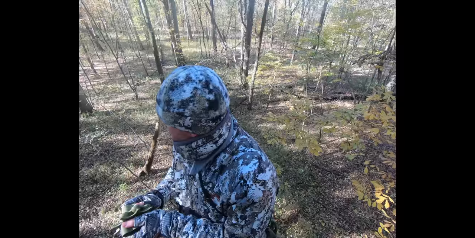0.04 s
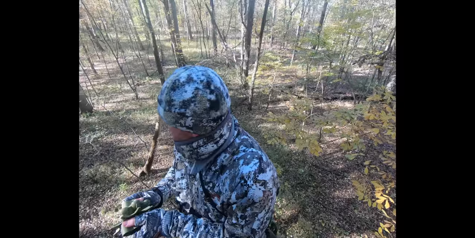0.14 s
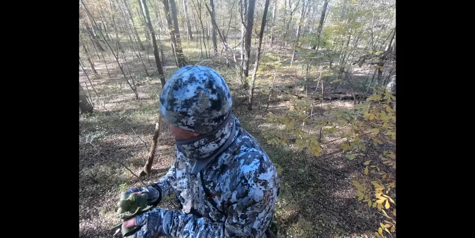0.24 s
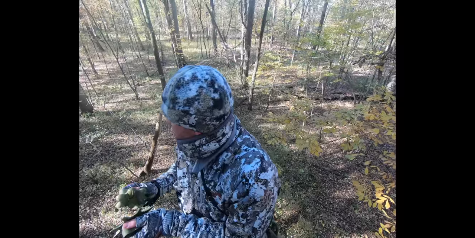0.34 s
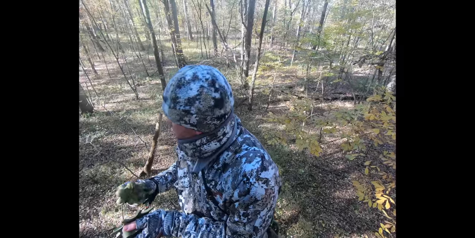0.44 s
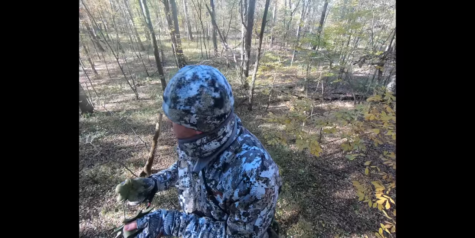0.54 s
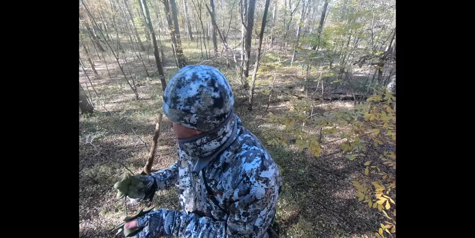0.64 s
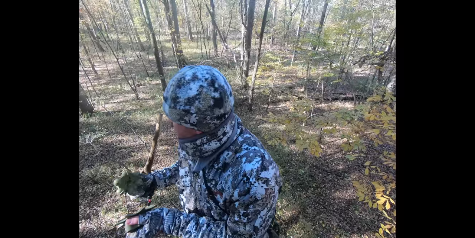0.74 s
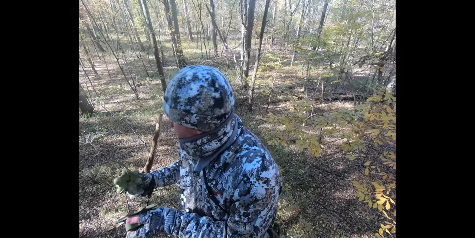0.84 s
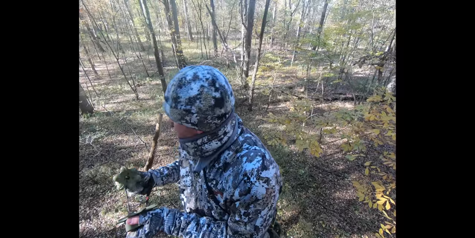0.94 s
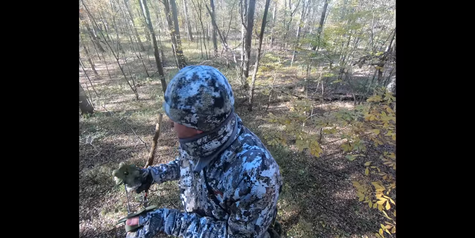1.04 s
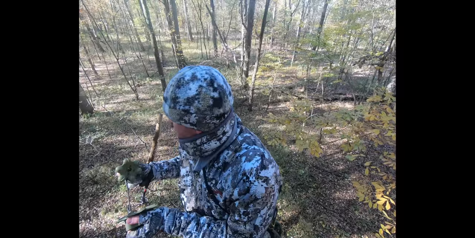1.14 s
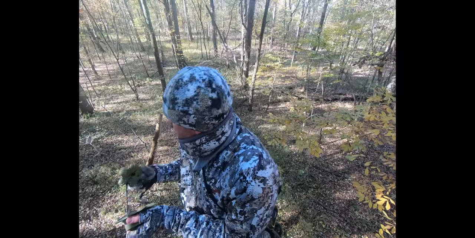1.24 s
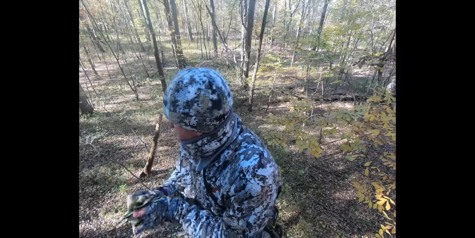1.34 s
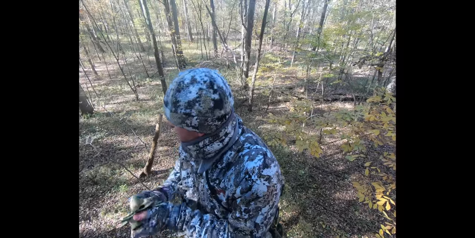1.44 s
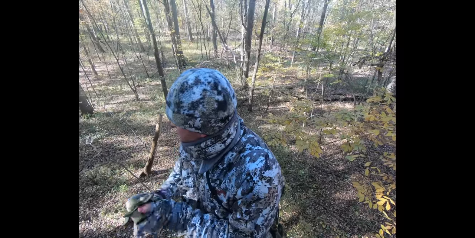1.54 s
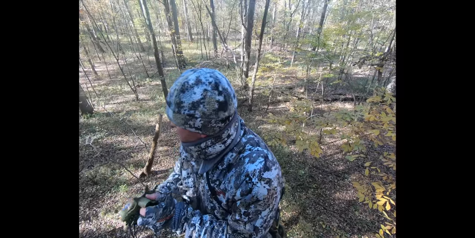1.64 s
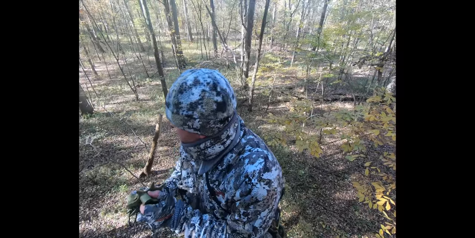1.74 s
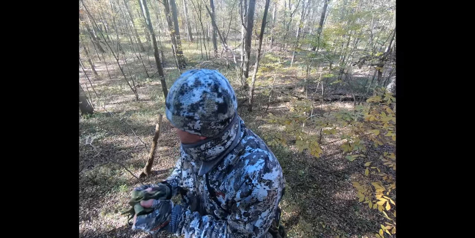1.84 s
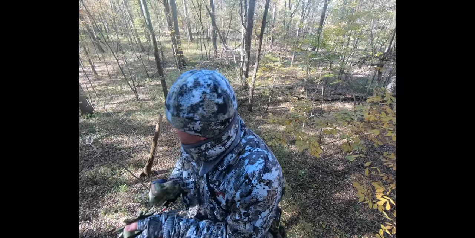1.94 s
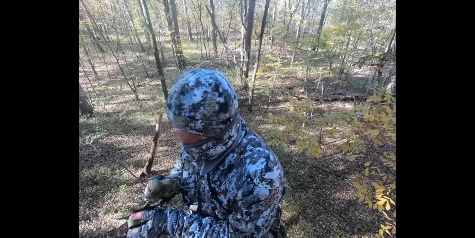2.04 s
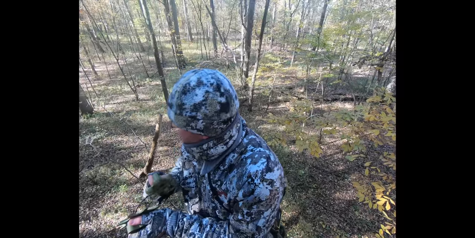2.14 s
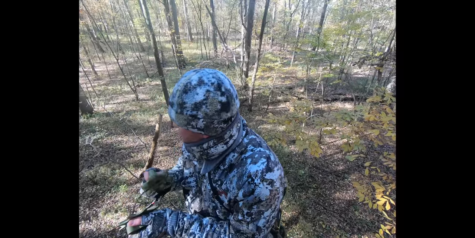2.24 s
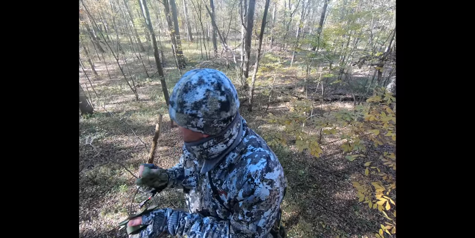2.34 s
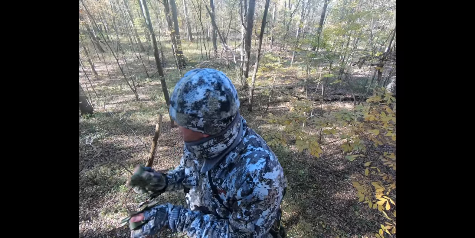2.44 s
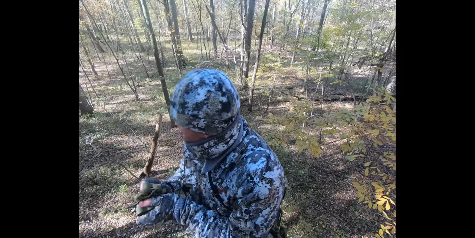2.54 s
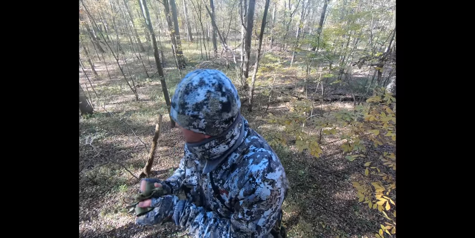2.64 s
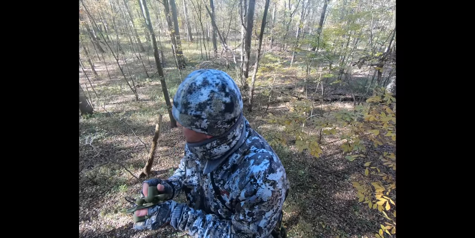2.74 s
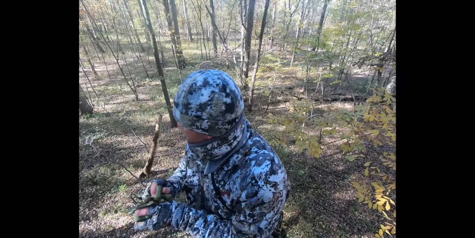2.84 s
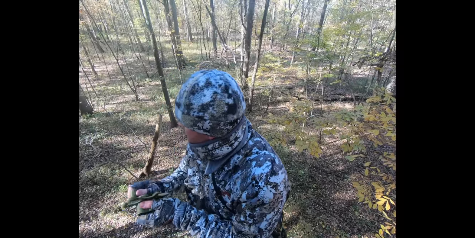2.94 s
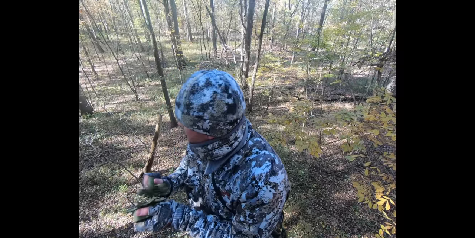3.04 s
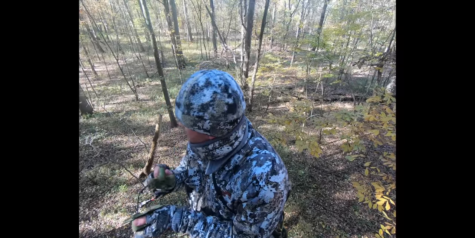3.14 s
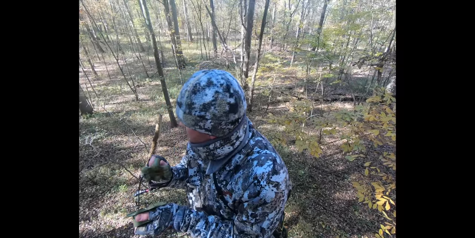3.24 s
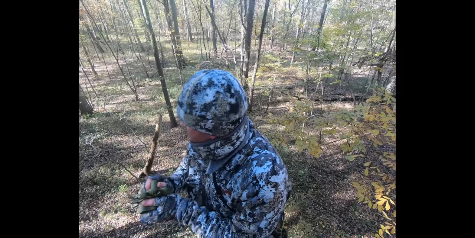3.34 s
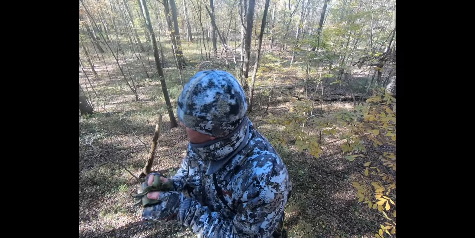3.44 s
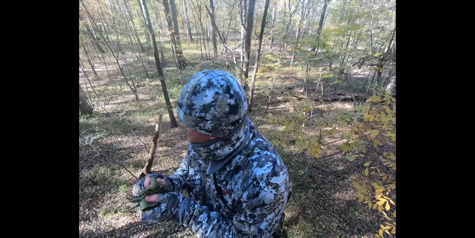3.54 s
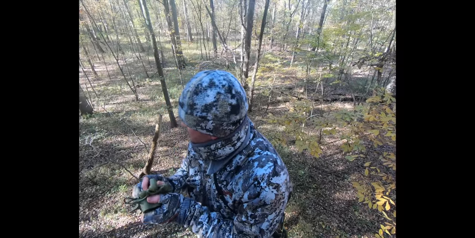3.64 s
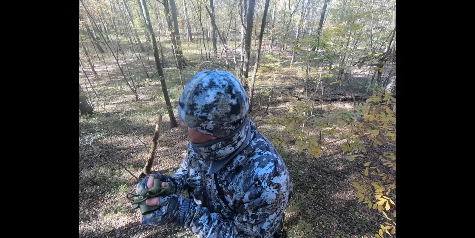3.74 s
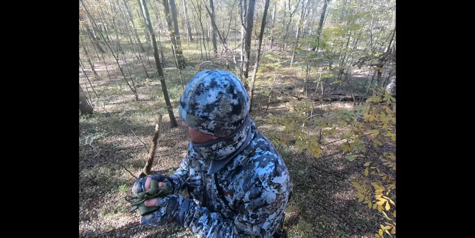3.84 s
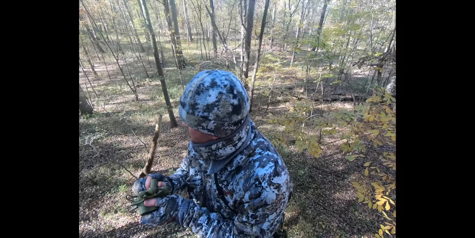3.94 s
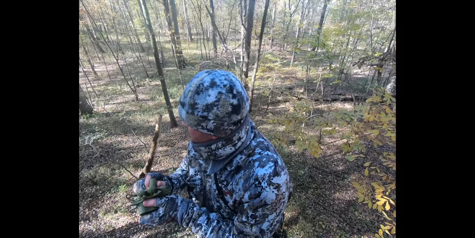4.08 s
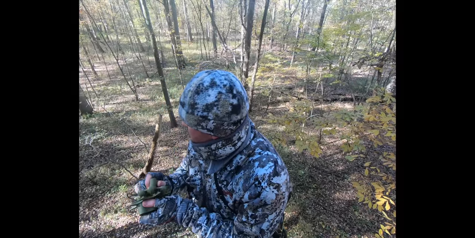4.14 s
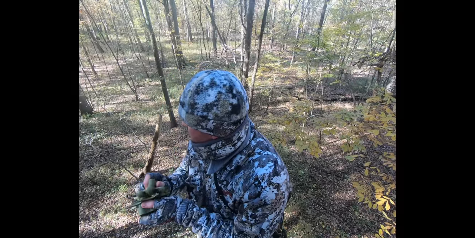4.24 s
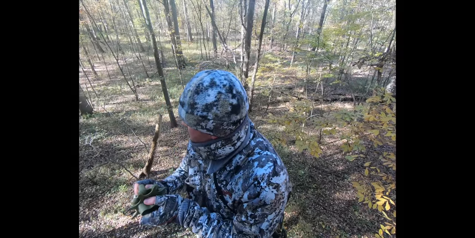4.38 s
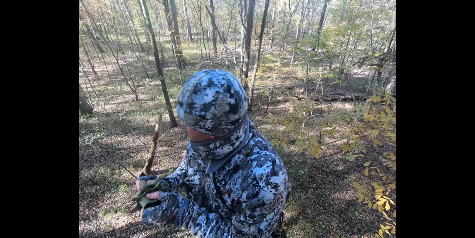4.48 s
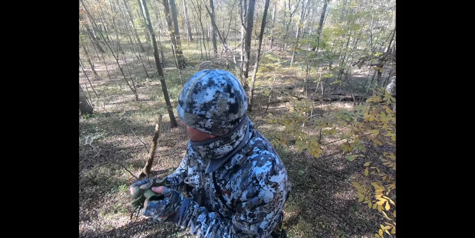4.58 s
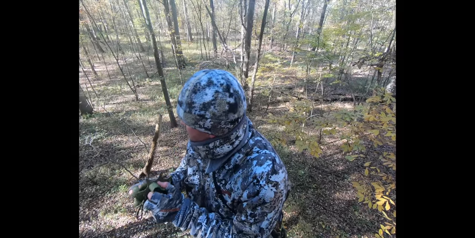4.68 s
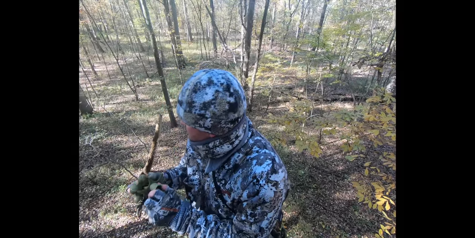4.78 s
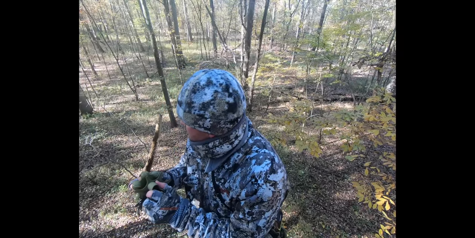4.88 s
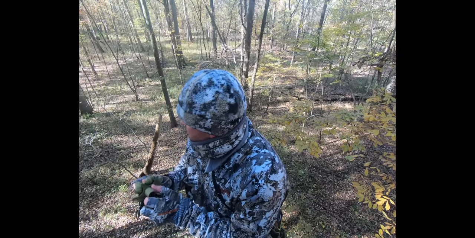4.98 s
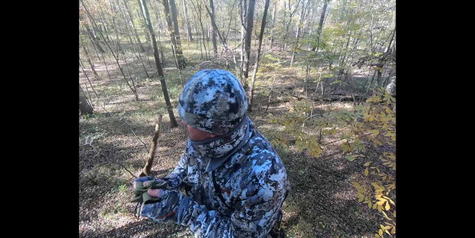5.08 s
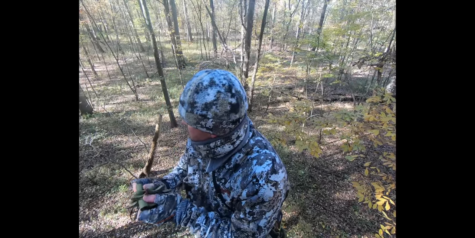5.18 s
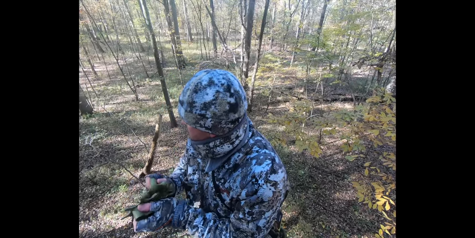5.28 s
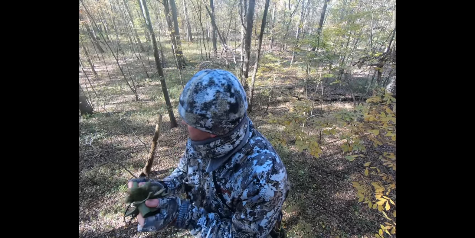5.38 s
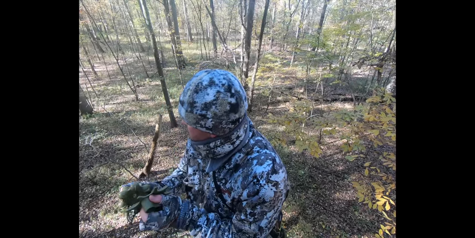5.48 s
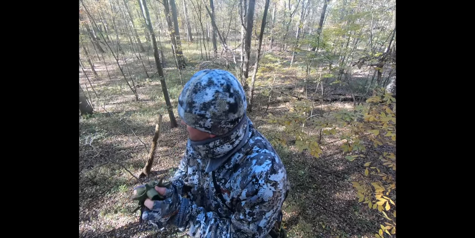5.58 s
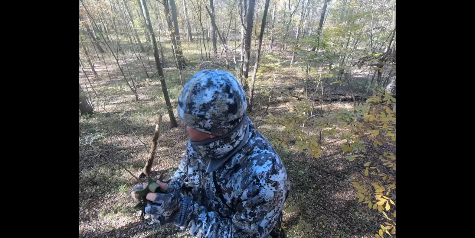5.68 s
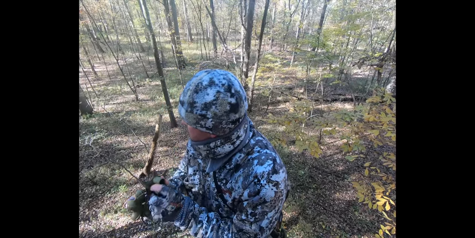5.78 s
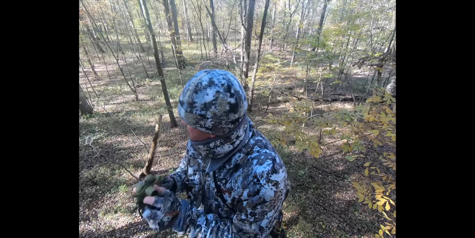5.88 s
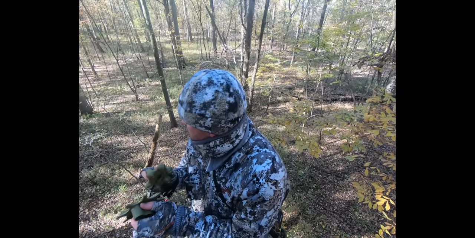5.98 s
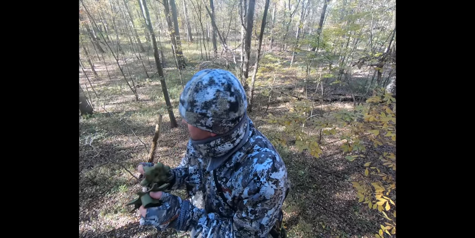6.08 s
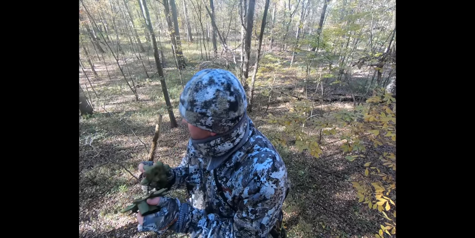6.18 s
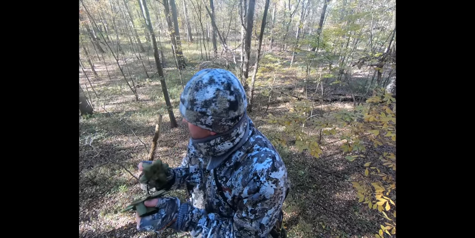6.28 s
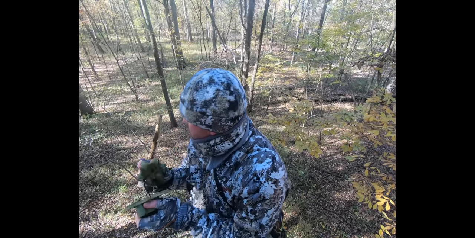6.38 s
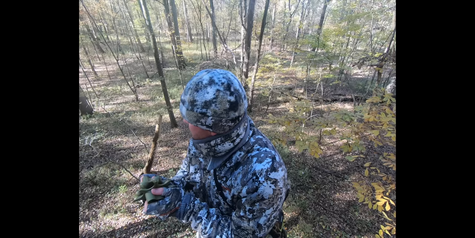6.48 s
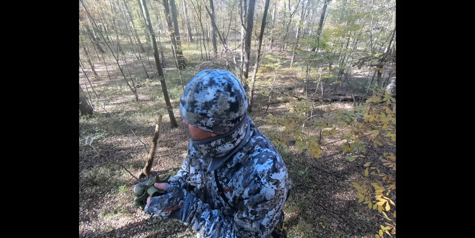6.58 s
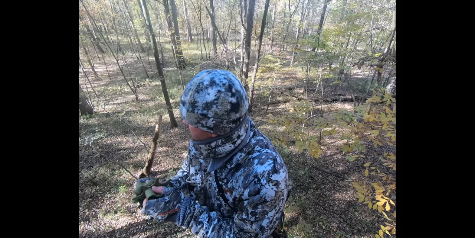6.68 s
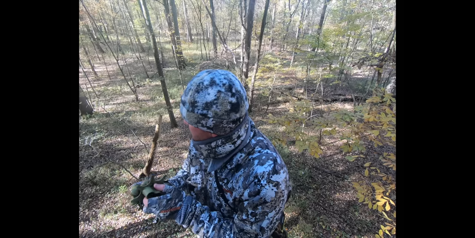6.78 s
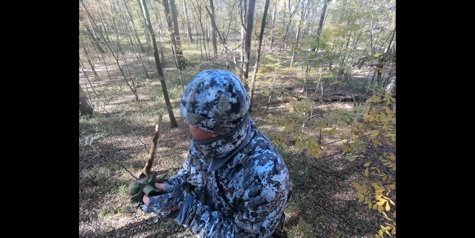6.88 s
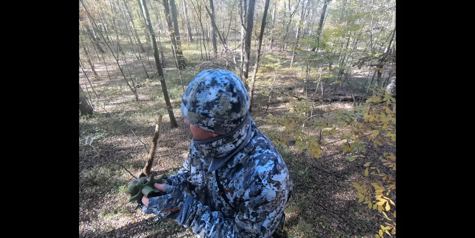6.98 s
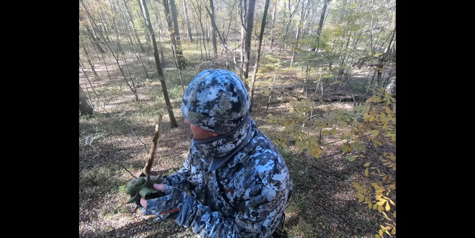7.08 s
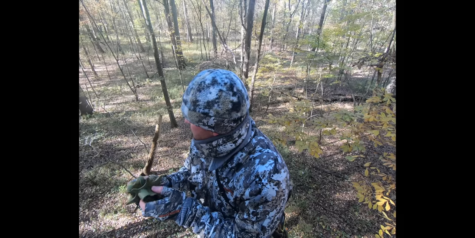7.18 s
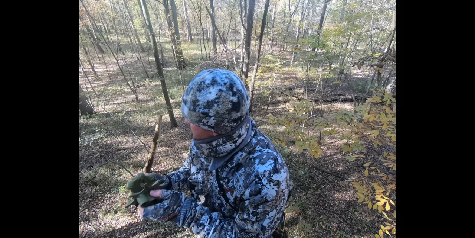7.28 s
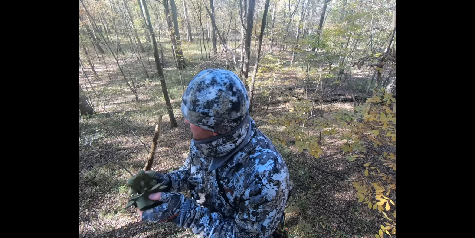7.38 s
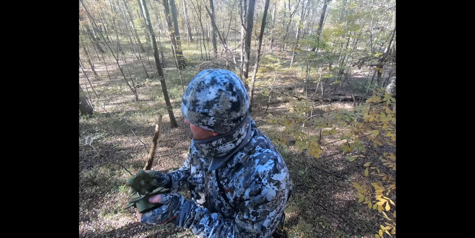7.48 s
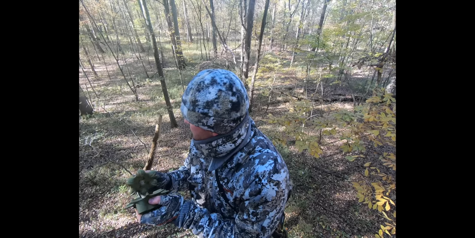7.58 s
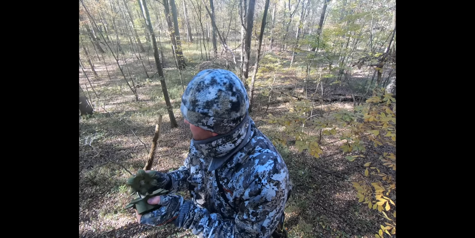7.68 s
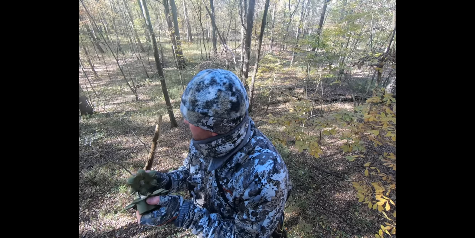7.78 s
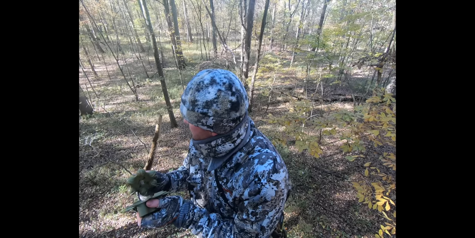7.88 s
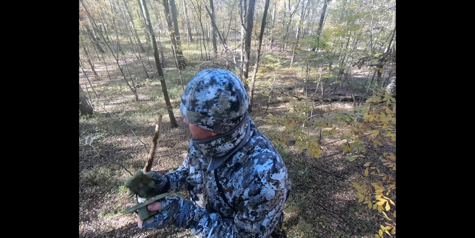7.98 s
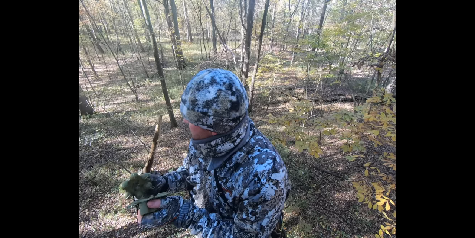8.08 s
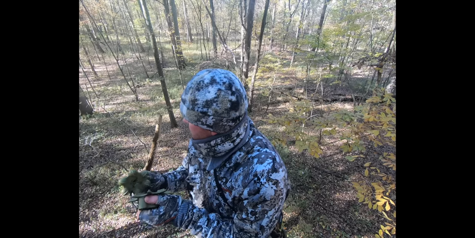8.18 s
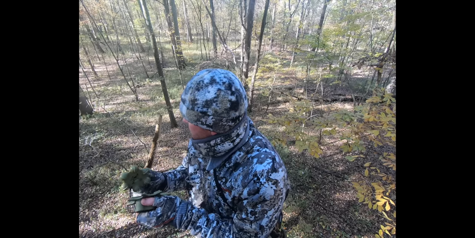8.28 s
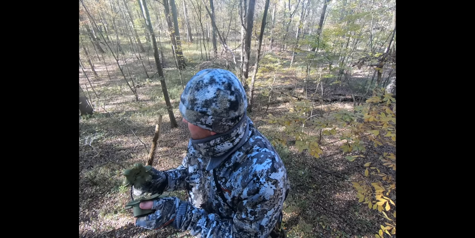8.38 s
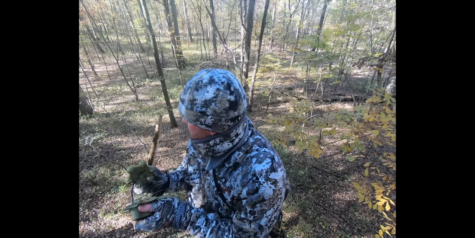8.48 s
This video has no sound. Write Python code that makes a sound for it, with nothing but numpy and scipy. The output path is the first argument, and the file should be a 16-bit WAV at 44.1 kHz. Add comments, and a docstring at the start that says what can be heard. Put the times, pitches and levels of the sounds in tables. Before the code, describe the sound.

Two deer antlers clack and grind together close by in short uneven bouts, sharp cracks echoing softly through quiet woods with faint bird calls.

```python
"""Antler rattling in a quiet wood

A hunter rattles two deer antlers in short bouts, an arm's length from a two-channel microphone.
Each clack is a run of tiny slips that rings the antlers; scattered echoes follow as a long soft tail.
Filtered noise makes faint glove and sleeve bumps; gliding sines make the thin calls of a far bird.
Far traffic is a shaped-noise wash with wavering sines for the engines."""
import sys
import numpy as np
from scipy import signal
from scipy.fft import rfft, irfft
from scipy.io import wavfile
from scipy.ndimage import uniform_filter1d, minimum_filter1d

SR = 44100
rng = np.random.default_rng(int(sys.argv[2]) if len(sys.argv) > 2 else 0)


def bounce(signal):
    """Save signal as a 16-bit WAV file at the path given by the first command-line argument."""
    frames = np.transpose(np.atleast_2d(signal))
    limited = np.clip(frames, -1, 1)
    pcm = np.round(limited * 32767).astype(np.int16)
    wavfile.write(sys.argv[1], SR, pcm)


N = 375732
TIME = np.arange(N) / SR


def from_db(db):
    """Decibels to gain."""
    return 10 ** (np.asarray(db) / 20)


def rms_one(x):
    """Scale to an rms of 1."""
    return x / np.sqrt(np.mean(x ** 2) + 1e-20)


def at_hz(points, hz):
    """Read a table on a log-frequency axis."""
    points = np.array(points)
    return np.interp(np.log(hz), np.log(points[:, 0]), points[:, 1])


def butter(x, hz, kind, order=2):
    """Causal Butterworth filter along time."""
    sections = signal.butter(order, np.clip(hz, 10, .45 * SR), kind, fs=SR, output="sos")
    return signal.sosfilt(sections, x)


def add(out, s, sound):
    """Mix a sound in, starting at s seconds."""
    start = max(0, round(s * SR))
    out[start:start + len(sound)] += sound[:N - start]


def drift(per_s):
    """Random wander joining per_s normal draws a second with straight lines."""
    knots = np.arange(0, N / SR + 2 / per_s, 1 / per_s)
    return np.interp(TIME, knots, rng.standard_normal(len(knots)))


def decorrelate(mid, side, mid_share, side_share):
    """Two channels from a shared part and a part of opposite sign, given their power shares."""
    return np.sqrt(mid_share) * mid + np.sqrt(side_share) * side * [[1], [-1]]


# Spectrum of still air and far traffic. Each row: frequency in Hz, relative density in dB per Hz.
AIR_SPECTRUM = [(13, -37.5), (22, -10.5), (49, -8.5), (91, -22.5), (151, 1.5), (251, -6.5), (276, -6),
                (480, -18.5), (796, -17), (877, -17.5), (1060, -28), (2530, -37.5), (4300, -38.5),
                (6960, -42), (9050, -71), (15300, -120)]
# Left-right likeness of the wash. Each row: frequency in Hz, likeness from 0 to 1.
LIKENESS_POINTS = [(30, 1), (70, 0.1), (150, 0.4), (400, 0.7), (1000, 0), (3000, 0.2), (10000, 0.18)]
# Tones of far engines. Each row: centre pitch in Hz, level in dB relative to the wash curve.
ENGINE_TONES = [(264.5, -6.5), (345.5, -11.5)]
# The level of the wash, lower during and after the bouts of rattling. Each row: time in seconds, level in dB
# before the wash gain.
WASH_CURVE = [(0.0, -62.5), (1.56, -63), (2.37, -67), (2.82, -66.5), (3.82, -68), (4.82, -62.5),
              (5.77, -66), (6.5, -63), (6.64, -67.5), (8.52, -63)]
# The deep engine drone coming and going. Each row: time in seconds, level in dB before the drone gain.
DRONE_CURVE = [(0.0, -69), (0.33, -65), (0.73, -79), (1.87, -85), (1.92, -66.5), (3.04, -85.5),
               (3.94, -69.5), (4.56, -71), (4.74, -88), (4.89, -66), (6.1, -69.5), (6.83, -89.5),
               (6.88, -72), (7.17, -73), (7.52, -62), (8.28, -75), (8.52, -87.5)]


def background(wash_gain_db=2, drone_gain_db=-3, drone_hz=41.7, waver_db=1.5,
               wander=0.012, drone_wander=0.14):
    """Far traffic: shaped noise for the wash, wavering sines for the drone and two engine tones."""
    wash_db = np.interp(TIME, *np.transpose(WASH_CURVE))
    drone_db = np.interp(TIME, *np.transpose(DRONE_CURVE))
    hz = np.maximum(np.fft.rfftfreq(N, 1 / SR), 1)
    mid, side = rfft(rng.standard_normal((2, N))) * from_db(at_hz(AIR_SPECTRUM, hz))
    alike = np.clip(at_hz(LIKENESS_POINTS, hz), 0, 1)
    wash = rms_one(irfft(decorrelate(mid, side, 1 + alike, 1 - alike), N))

    def tone(pitch_hz, db, spread):
        """A sine that wanders in pitch (spread as a fraction) and in level."""
        phase = 2 * np.pi * np.cumsum(pitch_hz * (1 + spread * drift(9))) / SR
        return from_db(db + waver_db * drift(3.9)) * np.sqrt(2) * np.sin(phase)

    engines = sum(tone(pitch_hz, wash_db + db, wander) for pitch_hz, db in ENGINE_TONES)
    drone = tone(drone_hz, drone_db + drone_gain_db, drone_wander)
    balance = from_db([[-.6], [.6]])
    return (from_db(wash_db + wash_gain_db) * wash + engines + drone) * balance


# Calls of a far bird. Each row: start in seconds, length in seconds, starting pitch in Hz,
# level in dB before the gains of the direct and scattered paths.
BIRD_CALLS = [(0.0, 0.13, 7700, -77), (0.448, 0.18, 7240, -62.5), (0.695, 0.16, 7800, -67),
              (2.297, 0.19, 6950, -68), (3.16, 0.11, 7080, -64.5), (3.356, 0.08, 7350, -67.5),
              (4.5, 0.22, 7260, -63), (5.46, 0.2, 7120, -70), (6.312, 0.12, 7070, -68),
              (7.415, 0.13, 6800, -66.5), (8.108, 0.052, 7650, -84.5), (8.299, 0.094, 7670, -78.5)]
BIRD_AIM_HZ = 7340   # every call glides towards this pitch


def bird(trill_hz=70, trill_depth_hz=120, waver_hz=80):
    """Thin whistles: sines gliding to one pitch, with a quick regular trill and a random shiver."""
    out, waver = np.zeros(N), waver_hz * drift(450)
    for s, length, first_hz, db in BIRD_CALLS:
        t = np.arange(int(length * SR)) / SR
        glide = np.linspace(first_hz, BIRD_AIM_HZ, len(t))
        trill = trill_depth_hz * np.sin(2 * np.pi * trill_hz * t)
        phase = 2 * np.pi * np.cumsum(glide + trill + waver[:len(t)]) / SR
        add(out, s, from_db(db) * signal.windows.tukey(len(t), .3) * np.sin(phase))
    return out


# Scattering by the trunks after a sharp click. Each row: band centre in Hz, relative level in dB,
# time to fall 60 dB in seconds.
WOOD_BANDS = [(300, -41.5, 0.66), (780, -32.5, .7), (1300, -23.5, 0.79), (1810, -16, 1.3), (2200, -11.5, 2),
              (2640, -18.5, 1.4), (3450, -15, 1.3), (4300, -22, 0.91), (5600, -22, 0.43), (6390, -30, .8),
              (6800, -25.5, .75), (7500, -38, .65), (8900, -34.5, 0.83), (10500, -56, 0.44),
              (13000, -83.5, .3)]


def wood(x, gap_s=.016, build_s=0.02, alike=.6, trunks_db=4, clumps_db=2, clumps_per_s=70):
    """Echoes from countless trunks: noise that builds up after a short gap and decays band by band."""
    size = 65536
    t, hz = np.arange(size) / SR, np.maximum(np.fft.rfftfreq(size, 1 / SR), 1)
    swell = 1 - np.exp(-np.maximum(t - gap_s, 0) / build_s)
    swell = swell * from_db(clumps_db * drift(clumps_per_s)[:size])   # trees stand in clumps
    trunks = from_db(trunks_db * rng.standard_normal(size))
    mid, side = rms_one(rng.standard_normal((2, size)) * trunks)
    alike = np.clip(alike, 0, 1)
    echoes = rfft(decorrelate(mid, side, alike, 1 - alike)) * from_db(at_hz(WOOD_BANDS, hz))
    centres, response = np.array(WOOD_BANDS)[:, 0], 0
    # overlapping triangular bands, each with its own decay
    for share, (centre, db, t60) in zip(np.eye(len(WOOD_BANDS)), WOOD_BANDS):
        fade = swell * from_db(-60 * t / t60)
        band = irfft(echoes * np.interp(hz, centres, share))
        response = response + band * fade / np.linalg.norm(fade)
    return signal.fftconvolve(x[None], response, axes=1)[:, :N]


# A light touch is hollow, a hard blow is all midrange: body below the midrange in relative dB
# at the medium level, and its change in dB per dB harder.
MEDIUM_DB, BODY_DB, BODY_PER_DB, COLOUR_SPREAD_DB = -22, -14.5, -0.48, 1
SLIP_S, SLIP_SPREAD = .0016, 0.12   # median decay time of a slip burst; spread in natural log units


def contact_rows(s, level_db, edge_db, tine_hz):
    """Colour contacts by their force: rows of (s, level dB, body dB, edge dB, tine Hz, slip s)."""
    body, edge, slip = rng.standard_normal((len(s), 3)).T
    body_db = BODY_DB + BODY_PER_DB * (level_db - MEDIUM_DB) + COLOUR_SPREAD_DB * body
    edge_db = edge_db + COLOUR_SPREAD_DB * edge
    return np.column_stack([s, level_db, body_db, edge_db, tine_hz, SLIP_S * np.exp(SLIP_SPREAD * slip)])


# Tine on tine. Each row: start in seconds, level in dB shared by all its catches, time the tines stay
# pressed in seconds, treble edge in relative dB before a random spread, ring of the struck tine in Hz.
CLACK_EVENTS = [(0.6458, -65, 0.0, -23, 2620), (1.0428, -41, 0.0, -10, 2780),
                (1.4095, -1.5, 0.0, -10.5, 3183), (1.6554, -23.5, 0.001, -13, 3650),
                (1.6915, -31, 0.01, -19, 3060), (1.7027, -8.5, 0.023, -21, 2210),
                (1.7639, -25.5, 0.0014, -22.5, 3180), (1.7921, -33, 0.0032, -21.5, 3020),
                (1.9119, -16.5, 0.012, -10, 3434), (1.9163, -8.5, 0.01, -29, 3070),
                (1.9549, -26, 0.0014, -19.5, 3180.0), (1.9642, -12, 0.0023, -19, 2160.0),
                (1.9817, -19.5, 0.0017, -18, 3350), (2.0965, -33, 0.016, -13.5, 3700),
                (2.5709, -14.5, 0.00056, -10.5, 3460.0), (2.5754, -7.5, 0.0049, -11.5, 3730),
                (2.7897, -34.0, 0.002, -18, 1940), (2.8168, -40.5, 0.012, -26, 1940),
                (2.8386, -25.5, 0.0075, -34, 2140), (2.8724, -19, 0.0046, -25, 3520),
                (2.896, -24.5, 0.0, -24.5, 2240.0), (2.9348, -22.5, 0.0023, -19.5, 2540.0),
                (2.9514, -19.5, 0.0, -23.5, 2720.0), (2.9565, -21, 0.01, -23, 2374),
                (2.976, -13.5, 0.0036, -16.5, 2083), (2.9885, -11.5, 0.011, -18.5, 2200),
                (3.0097, -14, 0.0011, -28.5, 2200.0), (3.038, -21.5, 0.0035, -18.5, 3800),
                (3.0748, -36.5, 0.0, -15, 2358), (3.44, -5.5, 0.0, -15.5, 2020),
                (3.7266, -33, 0.0015, -39, 2240.0), (3.7848, -43, 0.0033, -40, 2380),
                (3.8073, -45.5, 0.0029, -32, 2400), (4.1877, -60, 0.0041, -30, 2180),
                (4.29, -53, 0.0048, -31, 2230), (4.3388, -40, 0.0, -32, 2270),
                (4.3891, -25, 0.0021, -17, 2180), (4.4057, -13.5, 0.0034, -16.5, 2380),
                (4.4997, -31.5, 0.0, -19.5, 2090.0), (4.5268, -34.5, 0.0, -18, 2480.0),
                (4.5544, -24, 0.0, -11, 2230), (4.6364, -24.5, 0.0, -20, 1980),
                (4.6479, -17.5, 0.0071, -24, 2220), (4.6835, -24, 0.0, -17, 3470),
                (4.6974, -21.5, 0.00074, -13.5, 2290.0), (4.71, -11.5, 0.014, -27, 2090),
                (4.7415, -23.5, 0.0, -14.5, 2510), (4.7637, -27, 0.0, -22, 3130),
                (4.781, -25.5, 0.0, -18.5, 2900), (4.801, -20.5, 0.0028, -20.5, 2330),
                (4.8133, -12.5, 0.0047, -17, 3320), (4.8304, -16.5, 0.014, -19, 3210),
                (4.8546, -27.5, 0.0, -19, 3520.0), (4.8757, -19.5, 0.0, -15, 3360),
                (4.8927, -17.0, 0.0, -21, 2010.0), (4.9155, -26, 0.0017, -15.5, 3696),
                (4.9664, -20, 0.0031, -15, 2140.0), (4.9838, -8.5, 0.0097, -18, 3260),
                (5.0834, -23.5, 0.0, -19, 2380.0), (5.1032, -13, 0.0061, -17.5, 3330.0),
                (5.1198, -12.5, 0.019, -17, 3220.0), (5.1351, -16, 0.0, -22, 3270),
                (5.166, -27.5, 0.0, -22.5, 3200), (5.1897, -12.5, 0.012, -20.5, 3200),
                (5.2599, -34.0, 0.00056, -29, 2440), (5.2861, -17.5, 0.00028, -26.5, 3290),
                (5.3201, -19.5, 0.0, -24.5, 2290), (5.3372, -17.0, 0.00097, -17.5, 3250),
                (5.3543, -23.5, 0.0021, -24, 2180), (5.375, -26.5, 0.0, -24, 1980.0),
                (5.625, -6, 0.00033, -23.5, 2205), (5.6991, -36, 0.0062, -21, 2180),
                (5.805, -23.5, 0.0056, -32, 2260), (5.8183, -28, 0.00035, -25, 2310.0),
                (5.8324, -27, 0.0053, -24, 3515), (5.9303, -11, 0.0094, -21.5, 3386),
                (5.961, -13, 0.011, -20.5, 3153), (5.9844, -15.5, 0.0037, -23.5, 3500),
                (6.0003, -21.5, 0.0, -16, 3220), (6.5494, -8, 0.0037, -27, 3450.0),
                (6.5608, -12, 0.011, -16, 2139), (6.5975, -35, 0.00052, -20, 2030),
                (6.6133, -12.5, 0.00032, -15.5, 2230), (6.7359, -29.5, 0.0011, -23, 3290.0),
                (6.7605, -31.5, 0.0016, -40, 2290.0), (6.775, -41, 0.0042, -35, 2100),
                (6.9166, -37.5, 0.0047, -39, 3350), (8.416, -61.5, 0.0, -25.5, 3250)]
# the tines catch again at short uneven intervals, sinking while pressed and dying fast once they part
CATCH_S, CATCH_JITTER, CATCH_SPREAD_DB = .0048, .25, 2.5   # jitter in natural log units
PRESSED_DB_PER_S, PARTED_DB_PER_S = 200, 5000
GRAZE_DB = -40   # most that parting takes off a catch


def clacks(count=6):
    """Each clack shares its energy among a first blow and a quick run of catches."""
    s, level_db, pressed_s, edge_db, tine_hz = np.array(CLACK_EVENTS).T[:, :, None]
    shape = (len(s), count)
    gaps = CATCH_S * np.exp(CATCH_JITTER * rng.standard_normal(shape))
    delay = np.cumsum(gaps, axis=1) - gaps
    parted_db = np.maximum(-PARTED_DB_PER_S * np.maximum(delay - pressed_s, 0), GRAZE_DB)
    catch_db = parted_db - PRESSED_DB_PER_S * delay + CATCH_SPREAD_DB * rng.standard_normal(shape)
    # the catches of one clack add up to the energy of its level
    catch_db = catch_db - 10 * np.log10(np.sum(from_db(catch_db) ** 2, axis=1, keepdims=True))
    columns = np.broadcast_arrays(s + delay, level_db + catch_db, edge_db, tine_hz)
    return contact_rows(*(column.ravel() for column in columns))


# Locked antlers twisted against each other. Each row: start in seconds, end in seconds,
# mean level of the small ticks in dB.
GRIND_SPANS = [(1.07, 1.094, -62), (1.659, 1.812, -36), (1.929, 2.002, -32), (2.93, 3.098, -37.5),
               (4.494, 4.561, -41.5), (4.633, 4.942, -37.5), (5.043, 5.388, -47), (5.795, 6.001, -50),
               (6.568, 6.618, -32.5)]
TICKS_PER_S, TICK_SPREAD_DB, TICK_EDGE_DB, TINE_RANGE_HZ = 55, 1, -27, (2000, 3940)


def grinding():
    """Twisted antlers tick unevenly, one tick at a random moment of each short slot, on any tine."""
    ticks = []
    for start, end, db in GRIND_SPANS:
        count = round((end - start) * TICKS_PER_S)
        s = start + (end - start) * (np.arange(count) + rng.random(count)) / count
        level_db = db + TICK_SPREAD_DB * rng.standard_normal(count)
        ticks.append(contact_rows(s, level_db, TICK_EDGE_DB, rng.uniform(*TINE_RANGE_HZ, count)))
    return np.vstack(ticks)


# Resonances of the pair of antlers. Each row: frequency in Hz, relative strength in dB before
# a random spread, time to fall 60 dB in seconds.
ANTLER_MODES = [(800, -18.5, 0.0023), (1256, -7, 0.014), (1510, 0, 0.0072), (2060, 6, 0.0052),
                (2243, 2.5, 0.009), (2724, 0, 0.0051), (3216, -3, 0.017), (3620, -5.5, 0.016),
                (4070, -10, 0.0087), (4605, -4, 0.0099), (5170, -9.5, 0.012), (5730, -6, 0.009),
                (6570, -14.5, 0.0074), (7020, -22.5, .018), (9160, -23.5, 0.012), (10000, -42.5, .008),
                (12100, -36.5, .008)]


def antlers(contacts, first_touch=4.0, grit=0.58, scrape_db=-27, scrape_s=0.015, snag_share=0.016,
            tine_db=-5, tine_t60=0.013, crack_db=-21, crack_hz=6000, spot_db=3.0,
            knock_db=-17, snap_db=-17):
    """Each contact is a burst of tiny slips that rings the antlers, with new mode strengths at every spot."""
    s, level_db, body_db, edge_db, tine_hz, slip_s = contacts.T[:, :, None]
    t = np.arange(2048) / SR
    shape = (len(s), len(t))

    def unit(x):
        """Give each contact the energy of 2 ms at rms 1."""
        return x / np.sqrt(np.sum(x ** 2, axis=1, keepdims=True) / (.002 * SR))

    def ring(force, response):
        """Let the force excite a decaying response."""
        return signal.fftconvolve(force, response, axes=1)[:, :len(t)]

    # rough bone lands, catches many times within a few milliseconds, then slides on faintly
    slips = rng.standard_normal(shape) * np.exp(grit * rng.standard_normal(shape))
    force = first_touch * (t == 0) + slips * np.exp(-t / np.maximum(slip_s, 1 / SR))
    # the slide snags now and then on the pearled surface
    snags = slips * (rng.random(shape) < snag_share) / np.sqrt(snag_share)
    force = force + from_db(scrape_db) * snags * np.exp(-t / scrape_s)

    modes = np.array([from_db(db - 60 * t / t60) * np.sin(2 * np.pi * hz * t)
                      for hz, db, t60 in ANTLER_MODES])
    spots = (len(s), len(modes))
    strengths = rng.choice([-1, 1], spots) * from_db(spot_db * rng.standard_normal(spots))
    ringing = ring(force, strengths @ modes)
    tine = ring(force, from_db(-60 * t / tine_t60) * np.sin(2 * np.pi * tine_hz * t))

    clack = unit(ringing) + from_db(crack_db) * unit(butter(force, crack_hz, "low"))
    # three bands, balanced by the colour of each contact
    middle = unit(butter(unit(clack) + from_db(tine_db) * unit(tine), [1750, 4700], "band", order=4))
    low = butter(butter(clack, 1500, "low", order=5), 620, "high", order=3)
    body = from_db(body_db) * unit(low)
    edge = from_db(edge_db) * unit(butter(clack, [5200, 10800], "band", order=5))
    # the heavy beams knock low, and the touch itself snaps right to the top of the treble
    knock = from_db(body_db + knock_db) * unit(butter(force, [200, 450], "band"))
    snap = from_db(edge_db + snap_db) * unit(force)
    out = np.zeros(N)
    for start, sound in zip(s[:, 0], from_db(level_db) * (knock + body + middle + edge + snap)):
        add(out, start, sound)
    return out


def microphones(x, notch_hz=1780, notch_width_hz=1400, depth=.82, right_db=2.5):
    """The right port hears the antlers a shade later, louder and with a hollow in the midrange."""
    lag_s = .00003
    b, a = signal.iirpeak(notch_hz, notch_hz / notch_width_hz, fs=SR)
    right = x - np.clip(depth, 0, 1) * signal.lfilter(b, a, x)
    return np.array([x, from_db(right_db) * np.interp(TIME - lag_s, TIME, right)])


def ground(x, left_s=0.0039, right_s=.0039, bounce_db=-17, litter_hz=3000):
    """A dull, delayed bounce off the leaf litter reaches each port."""
    dull = from_db(bounce_db) * butter(x, litter_hz, "low", order=1)
    return np.array([np.interp(TIME - lag_s, TIME, dull) for lag_s in (left_s, right_s)])


def radiated(contacts, edge_hz=4200, edge_gain_db=14, dull_share=0.08):
    """Heard from all sides at once, a contact is a plain click, brighter when it has more edge."""
    clicks, edges = np.zeros((2, N))
    for s, level_db, _, edge_db, *_ in contacts:
        click = from_db([level_db]) * np.sqrt(.002 * SR)   # energy of 2 ms at the contact's level
        add(clicks, s, click)
        add(edges, s, click * (dull_share + from_db(edge_db + edge_gain_db)))
    return butter(clicks, edge_hz, "low", order=3) + butter(edges, edge_hz, "high", order=3)


# Gloves and sleeves bumping. Each row: start in seconds, peak in dB before the gain and stereo balance.
GLOVE_BUMPS = [(1.428, -42), (1.928, -41), (1.967, -40), (1.998, -45.5), (4.87, -45), (4.93, -44),
               (4.992, -42.5), (5.129, -52), (5.637, -46.5), (5.999, -56)]


def gloves(fade_s=0.018, gain_db=-7):
    """Soft dull bumps as the hands take up the blows: fading noise kept to a low band."""
    out, t = np.zeros(N), np.arange(SR // 4) / SR
    for s, db in GLOVE_BUMPS:
        bump = butter(rng.standard_normal(len(t)) * np.exp(-t / fade_s), [60, 110], "band", order=3)
        add(out, s, from_db(db + gain_db) * bump / np.abs(bump).max())
    return out


def scene(antlers_db=0, scatter_db=0, bird_direct_db=-6, bird_scatter_db=25):
    """Antlers and hands close by; the far bird arrives mostly by way of the trees."""
    traffic, calls = background(), bird()
    contacts = np.vstack([clacks(), grinding()])
    rattle = from_db(antlers_db) * antlers(contacts)
    hands = gloves() * from_db([[-4], [3]])
    near = microphones(rattle) + ground(rattle) + hands
    scattered = wood(from_db(scatter_db) * radiated(contacts) + from_db(bird_scatter_db) * calls)
    return near + scattered + from_db(bird_direct_db) * calls + traffic


CEILING, CUTOFF_HZ = .96, 16000   # limiter ceiling as amplitude; top of the passed treble


def record(dry, hiss_db=-94, hiss_hz=9000):
    """A fast limiter holds down the hardest clashes; the microphones hiss faintly and the top is cut."""
    needed = np.minimum(1, CEILING / (np.abs(dry).max(axis=0) + 1e-9))
    gain = uniform_filter1d(minimum_filter1d(needed, size=129), size=65)
    hiss = from_db(hiss_db) * rms_one(butter(rng.standard_normal((2, N)), hiss_hz, "low", order=4))
    return signal.sosfilt(signal.cheby2(12, 70, CUTOFF_HZ, fs=SR, output="sos"), gain * dry + hiss)


dry = scene()
out = record(dry)
bounce(out)
```